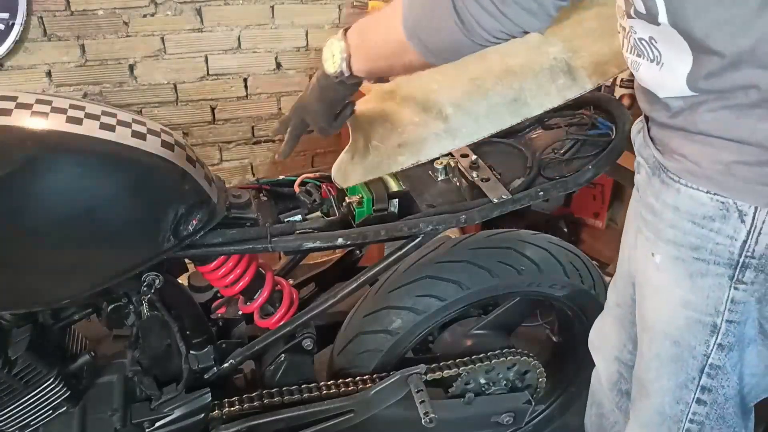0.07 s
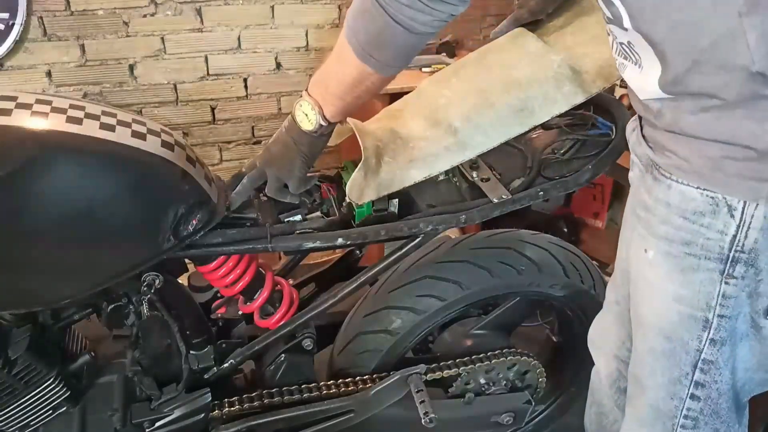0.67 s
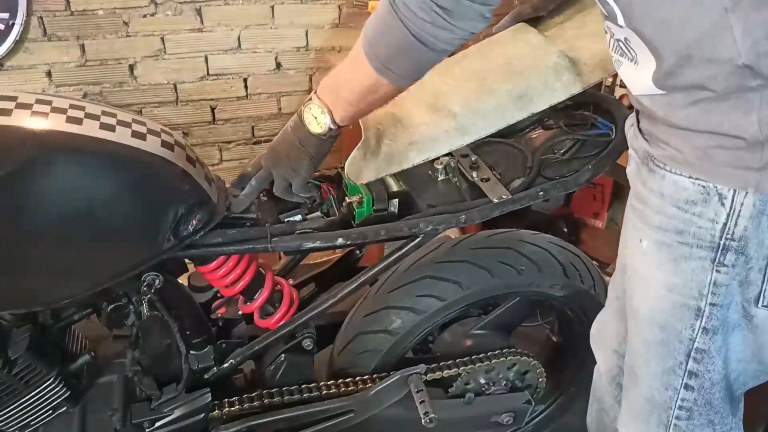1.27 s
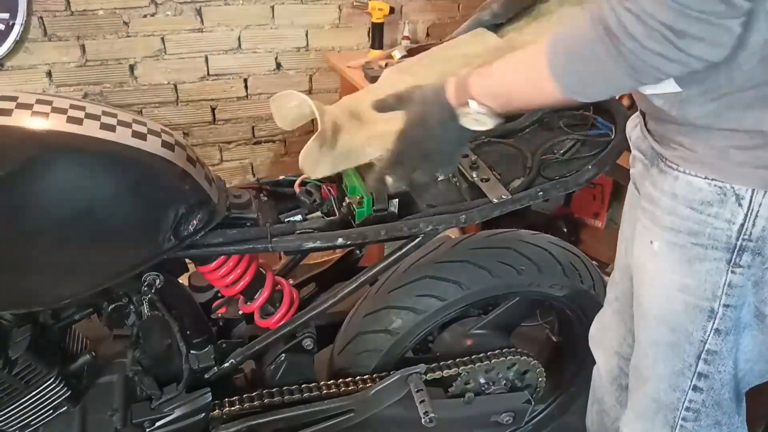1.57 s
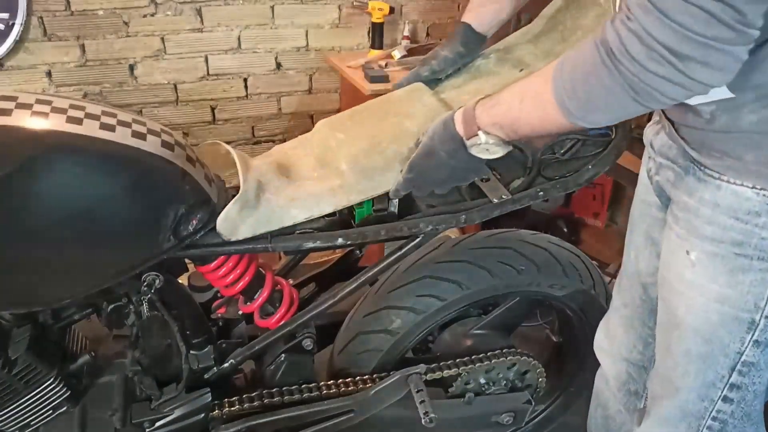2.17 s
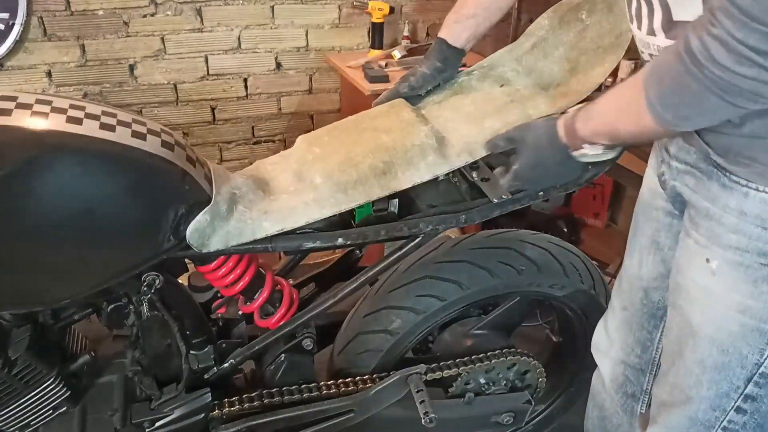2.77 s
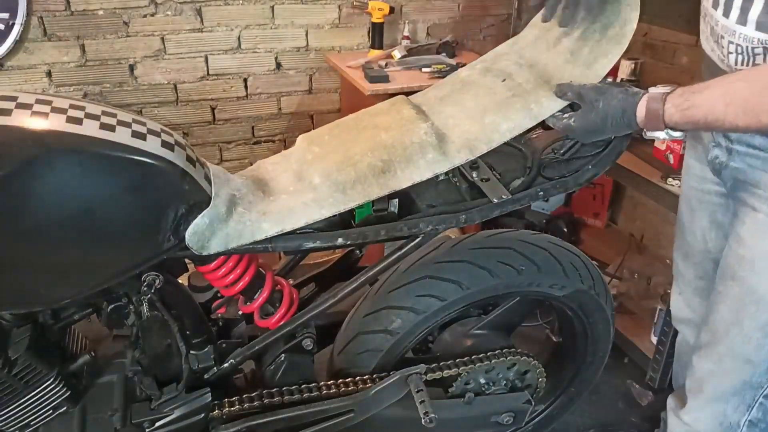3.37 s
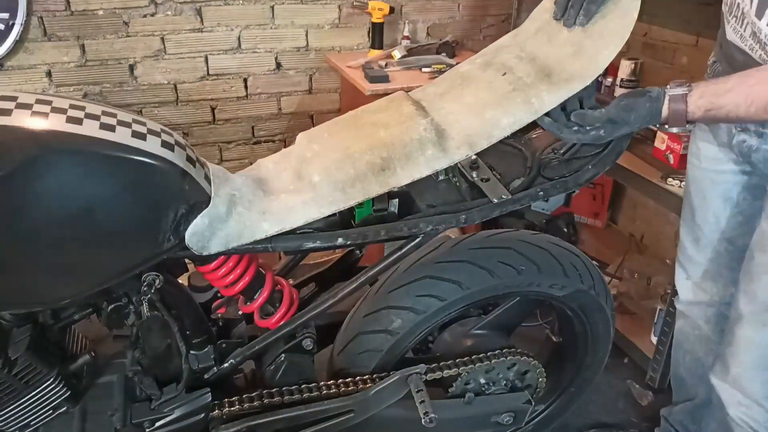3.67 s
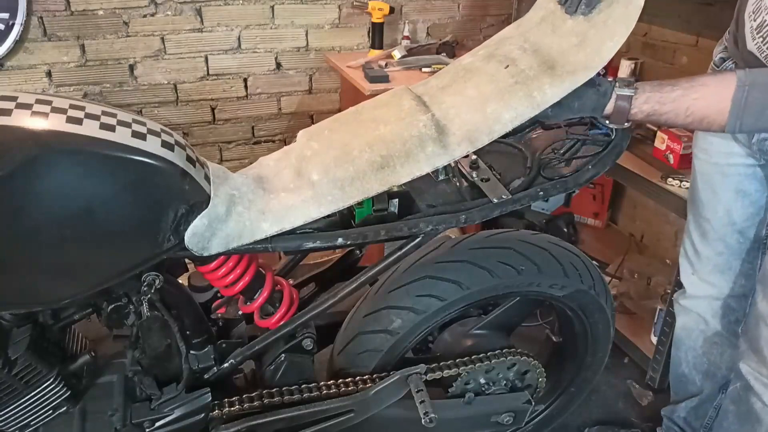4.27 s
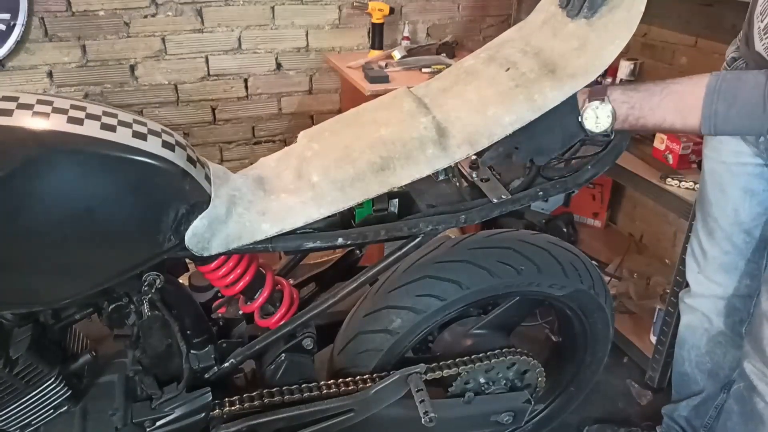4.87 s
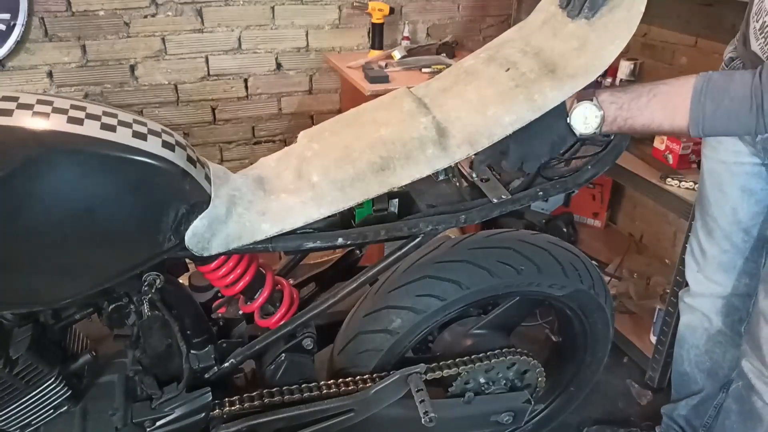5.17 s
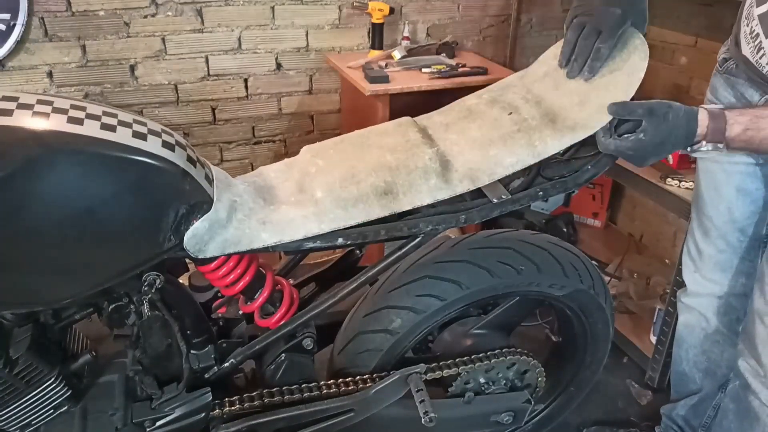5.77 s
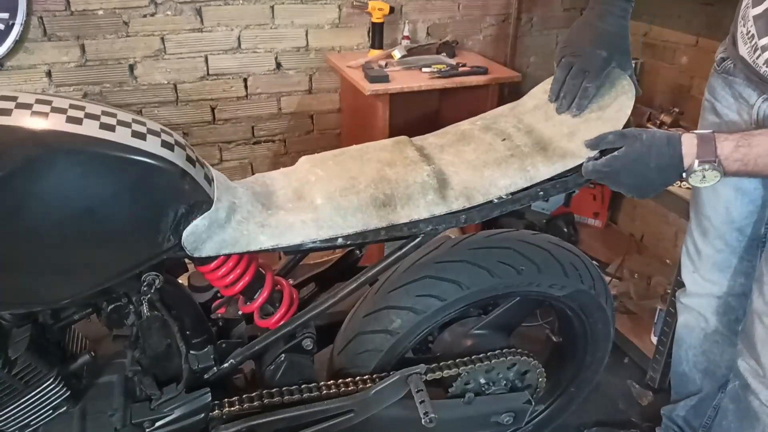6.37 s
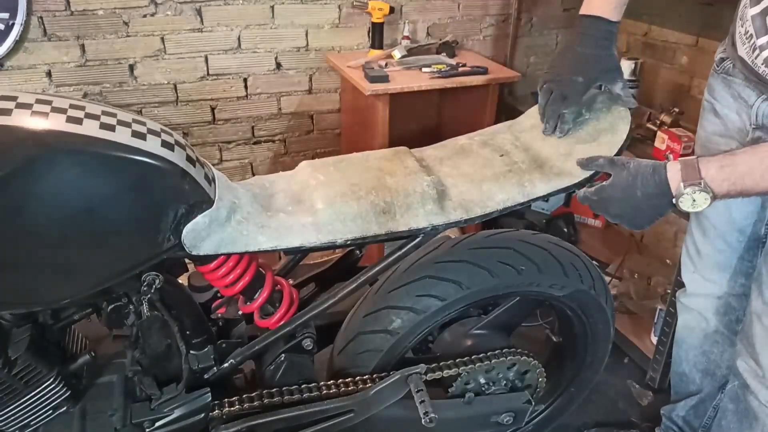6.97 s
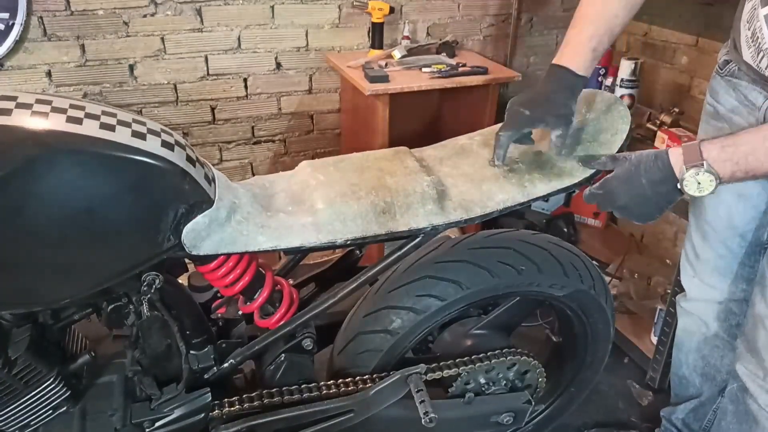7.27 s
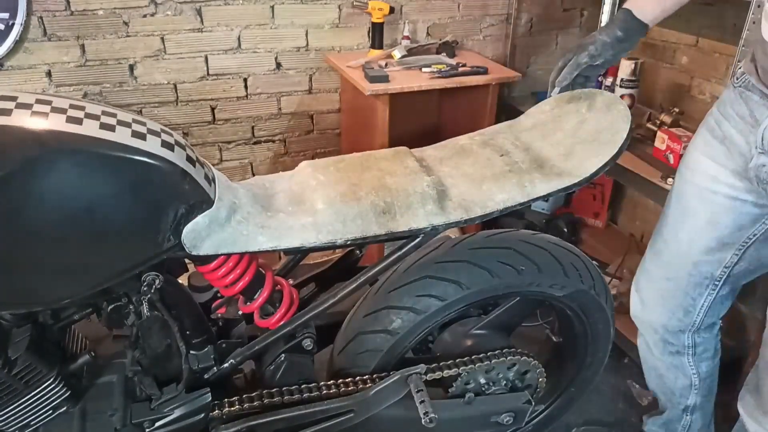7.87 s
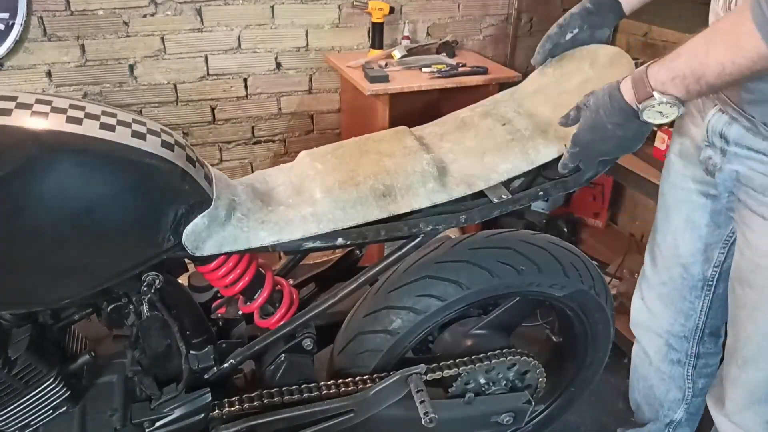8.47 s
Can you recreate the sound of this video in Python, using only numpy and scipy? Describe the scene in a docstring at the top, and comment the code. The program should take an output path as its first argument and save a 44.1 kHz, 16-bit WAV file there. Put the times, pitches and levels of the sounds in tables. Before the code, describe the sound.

A quiet brick workshop is heard up close, with low rumble and light hiss. Outside, slightly left, sparrows and another songbird chirp faintly throughout. A small click and soft taps open the scene, followed by brief rustles of gloves and sleeves. At about 2.3 seconds a stiff seat shell meets the motorcycle frame with a hollow, bouncing knock. A lighter tap comes at 3.1 and a short scrape at 3.6, then soft dull pats around 4.6 and 5.3. Gloves rub the shell near 6, and a sharp tick sounds at 6.3. At 6.7 a quick scrape leads into the loudest knock as the shell drops home, rattling and ringing briefly in the room. A duller thump follows at 7.3. A far engine hums very faintly from about 7.5, while light rubbing and small taps continue until the end at about 8.5 seconds.

```python
"""A small brick workshop, with two microphones close to a motorcycle frame.
A stiff seat mock-up is laid on the frame: its shell taps the tubes, drops home with a knock and is
patted down, each blow ringing the shell and the room. Gloves and sleeves rustle and rub on it.
Outside, a little to the left, sparrows and another songbird chirp and a far engine hums now and then."""
import sys
import numpy as np
from scipy import signal
from scipy.fft import rfft, irfft
from scipy.io import wavfile

SR = 44100
rng = np.random.default_rng(int(sys.argv[2]) if len(sys.argv) > 2 else 0)


def materialize(psi):
    """Save the field psi as 16-bit PCM at rate SR to the path in sys.argv[1].

    A 1-D psi becomes a single channel; in a 2-D psi each row is a channel.
    """
    bounded = np.clip(np.atleast_2d(psi).T, -1, 1)
    quanta = np.round(bounded * 32767).astype(np.int16)
    wavfile.write(sys.argv[1], SR, quanta)


N = 374850


def from_db(db):
    return 10 ** (np.asarray(db) / 20)


def unit_rms(x):
    return x / np.sqrt(np.mean(x ** 2) + 1e-20)


def seconds(length):
    return np.arange(int(length * SR)) / SR


def at_hz(points, hz):
    """Read a curve on a log-frequency axis."""
    freqs, values = np.transpose(points)
    return np.interp(np.log(hz + 1e-6), np.log(freqs), values)


def bin_hz(x):
    return np.fft.rfftfreq(x.shape[-1], 1 / SR)


def coloured(x, spectrum):
    return irfft(rfft(x) * from_db(at_hz(spectrum, bin_hz(x))), x.shape[-1])


def filtered(x, hz, kind):
    sections = signal.butter(2, np.clip(hz, 15, .45 * SR), kind, fs=SR, output="sos")
    return signal.sosfilt(sections, x)


def add(out, s, sound):
    """Mix a sound in at time s."""
    start = max(round(s * SR), 0)
    out[..., start:start + sound.shape[-1]] += sound[..., :N - start]


def arch(t):
    """A smooth swell from nothing to 1 and back."""
    return np.sin(np.pi * t / (t[-1] + 1 / SR))


def gate(t, attack_s, release_s):
    """Rise, hold, and fall to nothing at the end."""
    return np.clip(np.minimum(t / attack_s, (t[-1] - t) / release_s), 0, 1)


def flutter(size, hz):
    """A random waver up to the given rate; spread 1."""
    return unit_rms(filtered(rng.standard_normal(size + SR), hz, "low"))[-size:]


def diffuse(size, apart_hz=900):
    """Noise from all around: two close microphones hear the bass alike and the treble apart."""
    mid, side = rng.standard_normal((2, size))
    width = np.clip(bin_hz(mid) / apart_hz, .08, 1)
    side = irfft(rfft(side) * width, size)
    return np.array([mid + side, mid - side])


def from_left(x, lead_s=0.0003):
    """Sound from outside reaches the left microphone first."""
    samples = np.arange(N)
    return np.array([x, np.interp(samples - lead_s * SR, samples, x)])


def snap(spectrum, decay_s):
    """Coloured noise that starts at once and dies."""
    t = seconds(.2)
    return unit_rms(coloured(diffuse(len(t)), spectrum)) * np.exp(-t / decay_s)


# the workshop's reverberation time, before stretching: f/Hz, t60/s
ROOM_T60 = [(80, 0.48), (250, 0.82), (600, 0.72), (1500, 0.66), (4000, 0.48), (8000, 0.23), (16000, 0.22)]
def room(x, wet_db, stretch=0.92):
    """Reflections off the brick reach the microphones after 3 ms and die away octave by octave."""
    t = seconds(1)
    noise = diffuse(len(t))
    spectrum = rfft(noise)
    octave = np.log2(np.clip(bin_hz(noise), 62.5, 16000) / 62.5)
    tail = 0
    for k in range(9):
        band = irfft(spectrum * np.maximum(1 - abs(octave - k), 0), len(t))
        t60 = stretch * at_hz(ROOM_T60, 62.5 * 2 ** k)
        tail = tail + band * from_db(-60 * t / t60)
    onset = np.clip((t - .003) / 0.00042, 0, 1)
    tail = unit_rms(tail * onset) / np.sqrt(len(t))
    return from_db(wet_db) * signal.fftconvolve(np.atleast_2d(x), tail, axes=-1)[:, :N]


# room tone, the low rumble and the airy hiss: f/Hz, level/dB per Hz
RUMBLE = [(20, -117), (43, -124), (54, -110), (65, -105.5), (90, -92), (125, -92.5), (170, -95.5),
          (260, -100), (400, -104), (800, -113), (3000, -140)]
AIR = [(50, -125), (300, -104), (550, -102), (800, -106), (1200, -113), (2000, -116), (4000, -115),
       (7000, -118.5), (16000, -117)]
def room_tone(peak_s=2.44, rise_s=1.16, rest_db=1.5, swell_db=4.5, ease_db_per_s=0.4, outside_db=-8):
    """Steady hiss, partly from outside; the rumble swells as the shell comes onto the frame, then eases."""
    since_peak = np.arange(N) / SR - peak_s
    rise = np.clip(1 + since_peak / rise_s, 0, 1)
    swell = from_db(rest_db + swell_db * rise - ease_db_per_s * np.maximum(since_peak, 0))
    air = diffuse(N) + from_db(outside_db) * from_left(rng.standard_normal(N))
    return np.sqrt(SR / 2) * (swell * coloured(diffuse(N), RUMBLE) + coloured(air, AIR))


# an engine pulling, far off: t/s, length/s, start f/Hz, top f/Hz, level/dB
ENGINE_PULLS = [(1.1, 1, 72.7, 73.8, -68), (6.8, 0.56, 82.4, 84.8, -73), (7.472, 0.91, 84.44, 96.4, -56)]
def far_engine(rev_s=0.254, sag_db_per_s=8.5, waver_db=.8):
    """Only the smooth firing note gets through the walls; each pull revs up, swells, sags and stops."""
    out = np.zeros(N)
    for s, length, start_hz, top_hz, db in ENGINE_PULLS:
        t = seconds(length)
        hz = top_hz + (start_hz - top_hz) * np.exp(-t / rev_s)
        note = np.sqrt(2) * np.sin(2 * np.pi * np.cumsum(hz) / SR)
        level = from_db(db - sag_db_per_s * t + waver_db * flutter(len(t), hz=9))
        add(out, s, level * gate(t, attack_s=0.17, release_s=0.072) * note)
    return out


def whistle(hz, warble, warble_hz=130):
    """A bird's note: one sine with a quick uneven warble, given as a share of the pitch."""
    quiver = filtered(rng.standard_normal(SR), [warble_hz / 2, warble_hz * 2], "band")
    pitch = hz * (1 + warble * unit_rms(quiver)[-len(hz):])
    return np.sqrt(2) * np.sin(2 * np.pi * np.cumsum(pitch) / SR)


# a songbird outside, to the left: t/s, length/s, start f/Hz, end f/Hz, level/dB
SONG_NOTES = [(2.743, 0.029, 3800, 3190, -54.5), (4.52, 0.04, 2800, 3880, -60),
              (4.822, 0.042, 2660, 4020, -63.5), (4.866, 0.032, 3510, 3610, -67),
              (4.89, 0.036, 2440, 2520, -66.5), (4.899, 0.0504, 5080, 5120, -62),
              (4.948, 0.036, 5100, 5120, -65), (5.044, 0.031, 2720, 2390, -66.5),
              (5.734, 0.031, 3020, 2790, -66.5), (5.774, .03, 3320, 3350, -69),
              (6.622, 0.036, 3090, 3520, -59), (7.482, .026, 2980, 2765, -64),
              (8.012, 0.037, 3100, 3690, -61.5), (8.069, 0.035, 3650, 3040, -61),
              (8.47, 0.035, 3210, 2750, -62)]
def songbird(rasp_db=4, rasp_hz=140):
    """Short, hoarse, broken glides that ring on between the walls."""
    out = np.zeros(N)
    for s, length, start_hz, end_hz, db in SONG_NOTES:
        t = seconds(length)
        note = whistle(np.linspace(start_hz, end_hz, len(t)), warble=.03)
        rasp = from_db(rasp_db * flutter(len(t), rasp_hz))
        add(out, s, from_db(db) * arch(t) * unit_rms(note * rasp))
    return from_db(-6) * from_left(out) + room(out, wet_db=-4.5, stretch=0.74)


# sparrows outside, heard mostly by way of the walls:
# t/s, length/s, held f/Hz, level/dB, level of the fall against the held part/dB
CHIRPS = [(0.027, 0.08, 4170, -56, -2), (0.399, 0.1, 4100, -58.5, 0), (.658, 0.026, 4490, -61.5, 0),
          (0.722, 0.17, 4475, -61, -0.5), (0.984, .11, 4360, -59.5, -2), (1.29, 0.028, 4480, -64.5, 0),
          (1.456, .12, 4110, -58.5, 0), (1.527, 0.15, 4610, -61, -0.5), (1.985, 0.02, 4430, -59.5, -4),
          (2.093, 0.11, 4174, -59, 0), (2.416, .16, 4483, -62.5, -1), (2.663, 0.12, 4220, -56.5, -4.5),
          (2.878, 0.025, 4500, -63, 0), (3.005, .11, 4130, -60.5, -5), (3.24, .11, 4610, -64, 1),
          (3.511, 0.12, 4600, -58.5, -2), (3.798, 0.025, 4480, -60, 0), (3.953, .12, 4180, -58.5, -2.5),
          (4.073, .13, 4580, -61.5, 0.5), (4.31, 0.032, 4500, -63.5, 0), (4.5, 0.096, 4305, -56, -3),
          (4.877, 0.17, 4520, -60, -3.5), (5.211, 0.12, 4170, -60, -2), (5.45, 0.031, 4460, -69.5, 0),
          (5.63, 0.02, 4550, -61, 0), (5.803, 0.091, 4244, -58, -0.5), (5.948, .11, 4620, -63.5, 3),
          (6.287, 0.11, 4240, -58.5, -3.5), (6.73, 0.096, 4186, -56.5, -4), (6.969, .15, 4600, -59.5, -2),
          (7.226, .1, 4220, -62, -1), (7.774, 0.12, 4210, -61.5, 2), (7.846, 0.14, 4620, -61.5, -2),
          (8.238, .11, 4300, -58.5, -4)]
def sparrows(start_hz=4600, slide_s=.014, hold_s=0.044,
             drop_hz=1200, fall_hz_per_s=33000, fade_db_per_s=105):
    """Each chirp slides onto its pitch, lingers, then falls and fades; a short one ends before the fall."""
    out = np.zeros(N)
    quirks = rng.standard_normal((len(CHIRPS), 3))   # no two chirps are quite alike
    for (s, length, held_hz, db, fall_db), (pace, pitch, depth) in zip(CHIRPS, quirks):
        t = seconds(length)
        falling_s = np.maximum(t - hold_s * np.exp(0.2 * pace), 0)
        slide = (start_hz * (1 + 0.015 * pitch) - held_hz) * np.exp(-t / slide_s)
        fall = drop_hz * (1 + 0.1524 * depth) * np.tanh(fall_hz_per_s * falling_s / drop_hz)
        warble = np.where(falling_s > 0, .06, .034)   # the fall is buzzier
        note = whistle(held_hz + slide - fall, warble, warble_hz=179)
        level = from_db(db + fall_db * fall / drop_hz - fade_db_per_s * falling_s)
        add(out, s, level * gate(t, attack_s=0.022, release_s=0.0058) * note)
    return from_db(-13) * from_left(out) + room(out, wet_db=-3, stretch=1.64)


def friction(size, spectrum, grain_db, grains_per_s):
    """Fibres catch and let go in fine grains, bunched into slower scuffs."""
    steps = np.arange(size) * grains_per_s / SR
    knots = np.arange(2000)
    grains = np.interp(steps, knots, rng.standard_normal(len(knots)))
    scuffs = np.interp(steps / 8, knots, rng.standard_normal(len(knots)))
    grip_db = grain_db * np.minimum(grains + .5 * scuffs, 2)   # a fibre can hold only so much
    return unit_rms(coloured(diffuse(size) * from_db(grip_db), spectrum))


# colours of the cloth's hiss and the shell's scrape: f/Hz, level/dB
HISS = [(200, -28), (2000, -15), (4500, 3), (5600, 2), (7000, 7), (12000, -2), (16000, 1)]
SCRAPE = [(60, -13), (150, 7), (600, 5.5), (1100, 0.5), (2300, -6.5), (4000, -6.5), (16000, -31.5)]
# gloves and sleeves brushing, close by: t/s, length/s, rise/s, hiss level/dB, scrape level/dB
RUSTLES = [(0.072, 0.056, 0.01, -59.5, -69), (0.39, 0.11, .02, -75, -95), (0.573, 0.082, 0.024, -75, -79),
           (0.769, 0.051, .02, -63, -72), (1.343, 0.083, 0.043, -59.5, -70),
           (1.745, 0.12, 0.012, -62, -68.5), (2.183, 0.12, 0.004, -62.5, -65.5),
           (2.307, 0.13, 0.017, -62, -62.5), (2.932, 0.15, 0.034, -75, -69.5),
           (3.011, 0.18, 0.05, -65, -71.5), (3.235, 0.12, 0.0099, -67.5, -68),
           (3.385, 0.049, 0.003, -62, -67), (3.464, 0.13, 0.025, -66, -66.5),
           (3.588, 0.092, 0.024, -57, -56.5), (3.72, 0.063, 0.0092, -72, -83),
           (4.437, 0.042, .005, -69, -74), (4.64, .06, 0.022, -76, -76), (5.65, .12, 0.032, -63.5, -74.5),
           (5.804, 0.053, .01, -67, -80), (5.721, 0.58, 0.2, -94, -70.5), (6.181, 0.11, 0.08, -68.5, -71),
           (6.632, 0.062, 0.03, -49, -53.5), (6.656, 0.085, 0.048, -75, -51),
           (8.15, 0.27, 0.052, -71.5, -69), (8.384, 0.097, 0.014, -67, -66.5)]
def cloth_rustles():
    """Cloth hisses and the rough shell scrapes as one drags over the other."""
    out = np.zeros((2, N))
    for s, length, rise_s, hiss_db, scrape_db in RUSTLES:
        t = seconds(length)
        hiss = from_db(hiss_db) * friction(len(t), HISS, grain_db=3.5, grains_per_s=470)
        scrape = from_db(scrape_db) * friction(len(t), SCRAPE, grain_db=4, grains_per_s=200)
        add(out, s, (hiss + scrape) * gate(t, rise_s, release_s=0.038))
    return out


# a glove sliding on the shell, close by: t/s, length/s, resonance f/Hz, level/dB
RUBS = [(0.969, 0.074, 578, -68), (1.03, 0.21, 500, -71.5), (1.045, 0.44, 860, -81.5),
        (1.743, 0.11, 2320, -71.5), (2.188, 0.024, 2100, -58.5), (2.204, 0.081, 347, -64),
        (5.649, 0.073, 522, -70.5), (5.849, 0.24, 718, -63), (6.031, 0.26, 774, -68.5),
        (6.654, 0.062, 630, -56.5), (7.4, 0.3, 725, -70), (7.52, 0.25, 545, -72),
        (7.582, 0.042, 1230, -71.5), (7.719, 0.24, 524, -67.5), (8.33, 0.17, 390, -70)]
def glove_rubs(relative_width=0.22):
    """Each slide wakes one resonance of the hollow shell."""
    out = np.zeros((2, N))
    for s, length, hz, db in RUBS:
        t = seconds(length)
        half_width = relative_width * hz / 2
        hollow = filtered(diffuse(len(t)), [hz - half_width, hz + half_width], "band")
        add(out, s, from_db(db) * unit_rms(hollow) * arch(t))
    return out


# colour of a tick, from a glove or the shell's edge: f/Hz, level/dB
TICK_COLOUR = [(300, -31), (1500, -6), (3500, -8.5), (5500, -13), (7300, 1.5), (16000, -10)]
def glove_crackle(level_db=-70, ticks_per_s=9, spread_db=3):
    """The gloves creak throughout with faint random ticks."""
    out = np.zeros((2, N))
    for when, size in rng.random((int(ticks_per_s * N / SR), 2)):
        add(out, when * N / SR, from_db(level_db + spread_db * size) * snap(TICK_COLOUR, decay_s=0.0016))
    return out + room(out, wet_db=-6)


# the ring of small hard parts: f/Hz, level/dB, t60/s
TAP_MODES = [(564, -9.5, 0.12), (1520, -13.5, 0.21), (2294, -6.5, 0.056), (2645, -5, 0.029)]
# fingertips tapping and catching on them, close and central: t/s, level/dB
TAPS = [(0.069, -57), (0.089, -57), (0.9886, -69), (1.0395, -64), (1.395, -73), (1.7548, -70),
        (1.8037, -69), (1.8317, -68), (1.9404, -71.5), (2.1905, -56)]
def finger_taps(spread_db=2):
    """Light clicks with a short hollow ring; each wakes the modes a little differently."""
    t, out = seconds(.2), np.zeros(N)
    hz, mode_db, t60 = np.transpose(TAP_MODES)
    modes = from_db(-60 * t / t60[:, None]) * np.sin(2 * np.pi * hz[:, None] * t)
    for s, db in TAPS:
        add(out, s, from_db(db + mode_db + spread_db * rng.standard_normal(len(hz))) @ modes)
    return out + room(out, wet_db=-8)


# ticks at the frame, close by: t/s, level/dB, left minus right/dB
EDGE_TICKS = [(0.069, -39.5, 2), (0.7677, -46, 1), (1.3416, -57, -2), (2.19, -47, 1), (3.057, -53, 2),
              (3.096, -47, 0), (3.344, -55, -1), (3.388, -49.5, -8), (4.305, -56, -2), (4.439, -56, -3),
              (4.657, -60, 0), (6.2664, -31, -2), (6.6687, -42, -11), (6.7031, -33, -5), (7.062, -55.5, -4),
              (7.1198, -63, 5), (7.2522, -43, -5), (7.4745, -59, -6), (8.2837, -56, -1), (8.399, -52, -5)]
def edge_ticks(trim_db=-1.5):
    """The shell's edge catches on the frame in tiny bright snaps."""
    out = np.zeros((2, N))
    for s, db, pan_db in EDGE_TICKS:
        gains = from_db(trim_db + db + pan_db * np.array([[.5], [-.5]]))
        add(out, s, gains * snap(TICK_COLOUR, decay_s=0.0016))
    return out + room(out, wet_db=-4.5)


# modes of the shell on the frame, and standing waves between the walls: f/Hz, level/dB, t60/s
SEAT_MODES = [(133.5, -7.5, 0.058), (160, -13, 0.147), (185.5, -12.5, 0.14), (215, 0.5, 0.06),
              (278.4, -10, 0.13), (306.3, -1.5, 0.048), (342.7, -9.5, 0.11), (409, -6.5, 0.064),
              (437, -26, 0.42), (548, -13.5, 0.15), (582, -2, 0.071), (627, -2.5, 0.058), (697, -12, 0.08),
              (734, -15.4, 0.078), (780.5, -16.7, 0.097), (874, -15.5, 0.11), (941, -10, 0.066),
              (1072.8, -24.5, 0.23), (1210, -6.5, 0.05), (1261, -19, 0.14), (1352, -10, 0.039),
              (1412, -23.5, 0.116), (1642, -22, 0.1), (1937, -20.5, 0.09)]
ROOM_MODES = [(103, -19.5, .4), (183, -24.5, 0.58), (220.8, -29.5, .55), (269.3, -23.5, 0.61),
              (350, -25.5, .53), (405, -26, .52), (443.7, -28.5, .6), (630, -27, .36), (944.6, -28.5, 0.54)]
# the dense fine modes of a hard contact, and how strongly a blow fills the room: f/Hz, level/dB
CRACK = [(35, -40), (120, -2), (500, 8), (900, 7), (1300, -4), (1650, 6), (2100, 5.5), (3000, 1),
         (7000, -5), (16000, -15)]
KNOCK_ECHO = [(250, -1.5), (600, 0), (1100, 2), (2000, 5), (6000, 3.5)]
# blows on the shell, close by, bounces included: t/s, level/dB, top f/Hz (lower is softer),
# bass cut f/Hz, f/Hz favoured by the spot struck, width of that favour/octaves, crack level/dB
KNOCKS = [(0.086, -48, 600, 540, 580, 0.07, -64), (0.102, -47.5, 676, 514, 560, 0.062, -73),
          (2.19, -60, 2000, 400, 1975, 0.07, -57.5), (2.3027, -40, 1448, 122, 1140, 0.1, -46.5),
          (2.3087, -34.5, 1528, 911, 1200, 0.15, -53), (2.3129, -31, 924, 634, 587, 0.083, -50.5),
          (2.3245, -43.9, 925, 224, 576, 0.11, -53), (2.3457, -43, 1123, 110, 182, 0.16, -65),
          (2.3583, -43.3, 846, 279, 626, 0.07, -66), (2.4061, -38.5, 405, 114, 167, 0.22, -73),
          (2.423, -45.5, 849, 486, 578, 0.07, -70), (3.0606, -40, 1150, 243, 596, 0.039, -57),
          (3.1128, -48, 745, 96, 171, 0.2, -70), (3.604, -50.5, 1500, 200, 386, 0.07, -56),
          (4.61, -42.5, 139, 55, 106, 0.07, -66), (5.2526, -36.5, 341, 279, 437, 0.13, -62.5),
          (5.2628, -43.5, 519, 424, 577, 0.08, -70), (5.437, -46, 354, 271, 440, 0.19, -78),
          (6.266, -46, 1380, 380, 564, 0.061, -59), (6.7008, -22, 722, 123, 860, 0.16, -43),
          (6.7024, -12.5, 1450, 198, 609, 0.03, -41.5), (6.7084, -26, 414, 113, 290, 0.17, -37.5),
          (6.7266, -25.5, 669, 232, 203, 0.27, -60), (6.743, -28, 1296, 161, 626, 0.07, -55),
          (6.761, -32.5, 1420, 511, 616, 0.11, -50), (7.2529, -19.5, 290, 174, 312, 0.12, -55),
          (7.2796, -38.5, 537, 161, 215, 0.19, -75), (8.25, -51, 404, 150, 272, 0.079, -74),
          (8.394, -50, 880, 200, 400, 0.07, -62)]
def seat_knocks(favour_db=7.5, rise_s=0.0032, left_lag_s=0.000093, apart_hz=7000):
    """Each blow rings the same shell and room; softness and the spot struck pick which modes answer."""
    t, out = seconds(.7), np.zeros((2, N))
    hz, mode_db, t60 = np.transpose(list(SEAT_MODES) + list(ROOM_MODES))
    spread = 1 - np.exp(-t / rise_s)   # the bend takes a moment to cross the whole shell
    envelopes = spread * from_db(-60 * t / t60[:, None])
    phase = 2 * np.pi * hz[:, None] * t
    skew = np.pi * hz * left_lag_s   # the shell is a little nearer the right microphone
    skew += (-1) ** np.arange(len(hz)) * hz / apart_hz   # higher modes arrive further out of step
    modes = np.array([envelopes * np.sin(phase + side * skew[:, None]) for side in (-1, 1)])
    for s, db, top_hz, bass_hz, spot_hz, spot_octaves, crack_db in KNOCKS:
        favour = favour_db * np.exp(-(np.log2(hz / spot_hz) / spot_octaves) ** 2)
        ring = from_db(db + mode_db + favour) @ modes
        softened = filtered(ring, top_hz, "low")
        add(out, s, filtered(softened, bass_hz, "high"))
        add(out, s, from_db(crack_db) * snap(CRACK, decay_s=0.018))
    return out + coloured(room(out, wet_db=-11), KNOCK_ECHO)


def scene(lean_left_db=1.0):
    """Work on the seat close to the microphones; the outdoors and room tone a little to the left."""
    contacts = seat_knocks() + edge_ticks() + finger_taps()
    handling = cloth_rustles() + glove_rubs()
    near = contacts + handling + room(handling, wet_db=-3) + glove_crackle()
    far = sparrows() + songbird() + far_engine() + room_tone()
    return near + far * from_db([[lean_left_db], [-lean_left_db]])


# the microphones' response, with a deep notch in the treble: f/Hz, level/dB
MICROPHONE = [(4650, 1), (4950, -0.5), (5850, -1.5), (6200, 4), (7550, 5.5), (7800, -2), (8350, -0.5),
              (8800, -19.5), (11300, -14.5), (11800, -6.5)]
def record(dry, cutoff_hz=15900):
    """The microphones' colour, then a steep cut at the top."""
    heard = coloured(dry, MICROPHONE)
    return irfft(rfft(heard) / np.sqrt(1 + (bin_hz(heard) / cutoff_hz) ** 200), N)


dry = scene()
out = record(dry)
materialize(out)
```